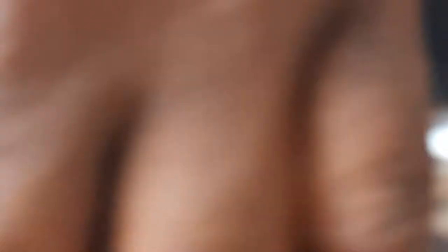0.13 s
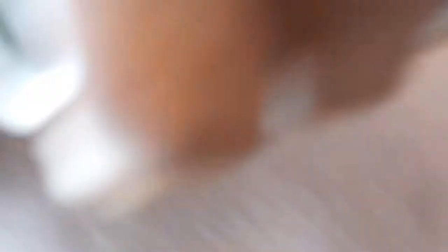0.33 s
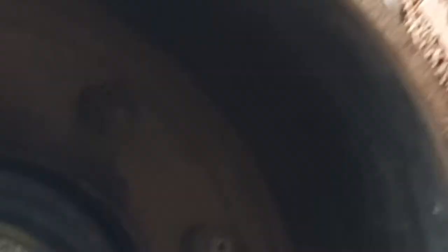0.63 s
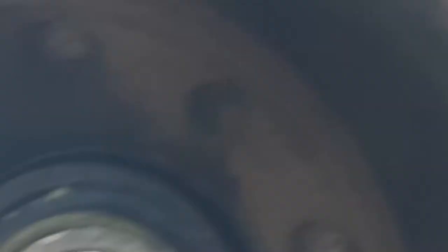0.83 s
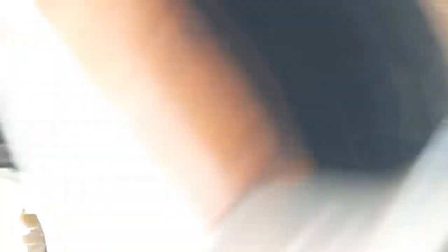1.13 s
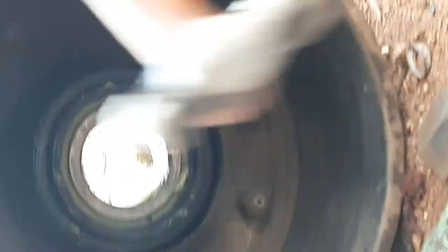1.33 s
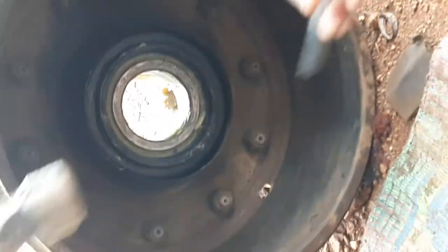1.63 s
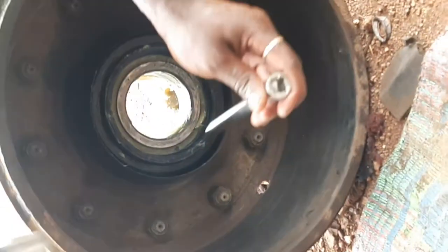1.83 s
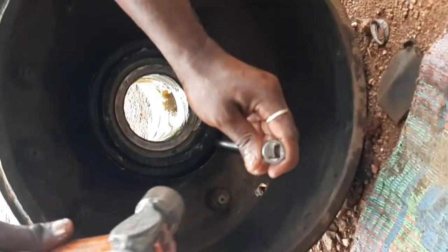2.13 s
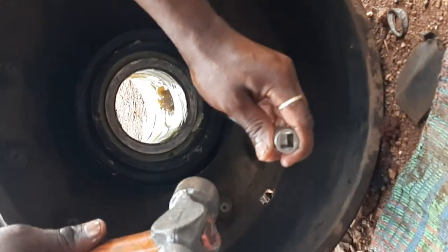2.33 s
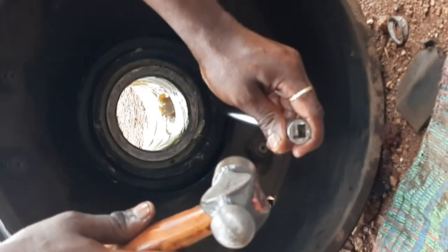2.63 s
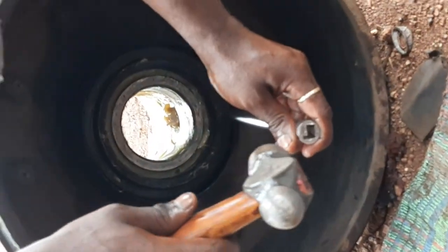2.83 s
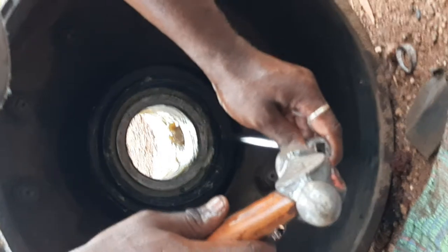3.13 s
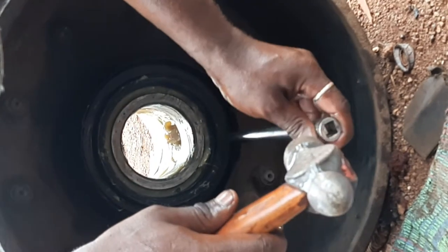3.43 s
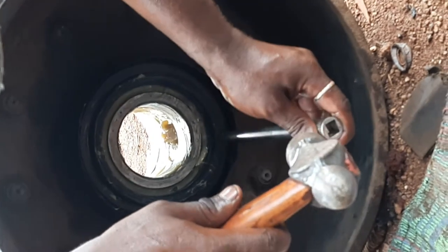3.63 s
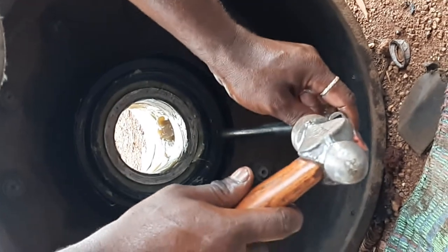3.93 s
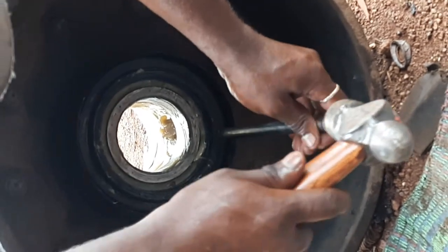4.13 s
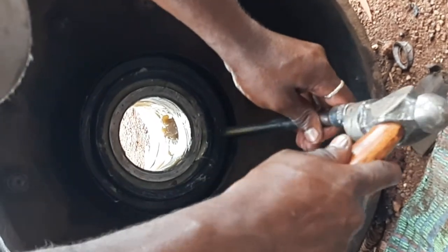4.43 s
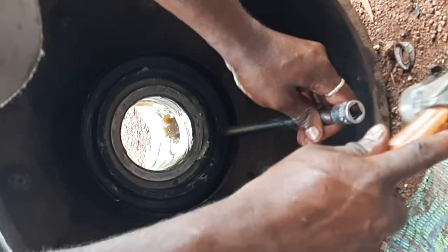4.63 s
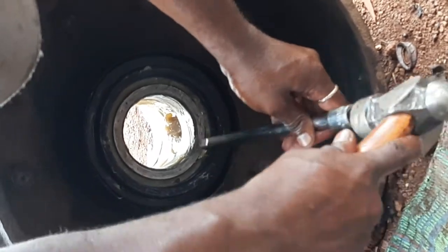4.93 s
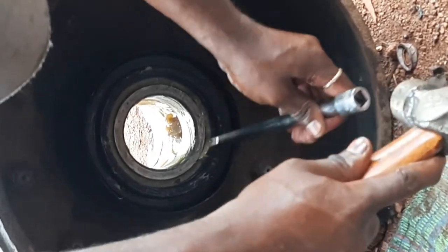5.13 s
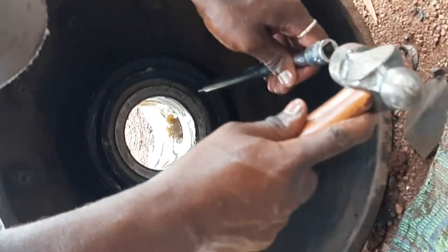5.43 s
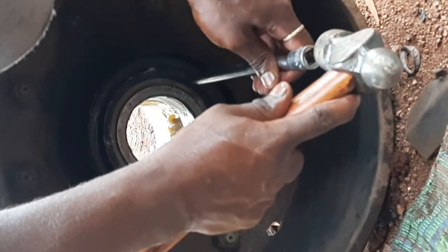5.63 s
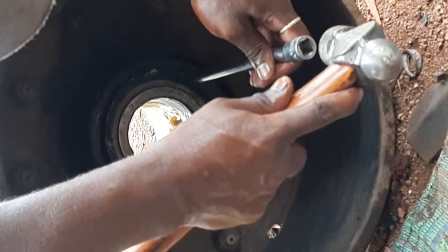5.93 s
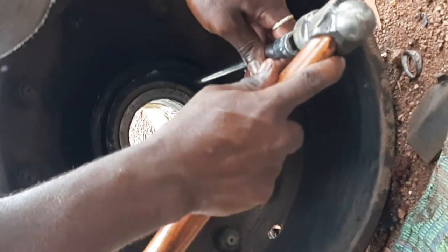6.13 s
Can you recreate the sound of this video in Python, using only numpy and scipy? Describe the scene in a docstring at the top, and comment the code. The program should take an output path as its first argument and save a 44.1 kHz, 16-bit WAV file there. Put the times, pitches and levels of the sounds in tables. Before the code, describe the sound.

A hammer knocks a hand-held steel drift in a hollow drum outdoors: one bright clink, a quiet pause, a hard crack, quick rebounds, a last tap.

```python
"""A ball-peen hammer and a hand-held steel drift work on a bearing seat in a heavy wheel drum, outdoors.
First a palm slides and fingers brush close by, over a low rumble and hiss, all of shaped noise that swells.
The hands bump and the drift touches its seat; then a blow: noise crack, ringing drift, clattering drum.
A faint bird sings in rising sine sweeps, and the drift touches the seat again.
From 4.4 s more blows and rebounds follow, the last at 6.1 s; the hand soon damps each ring."""
import sys
import numpy as np
from scipy import signal
from scipy.fft import rfft, irfft
from scipy.io import wavfile
from scipy.ndimage import uniform_filter1d

SR = 44100
rng = np.random.default_rng(int(sys.argv[2]) if len(sys.argv) > 2 else 0)


def wrap_up_sound(samples):
    """Save the sound to the file named by the first command line argument, as 16-bit audio."""
    columns = np.atleast_2d(samples).T
    # keep every value between -1 and 1, then stretch to whole-number steps
    tamed = np.clip(columns, -1, 1)
    steps = np.round(tamed * 32767).astype(np.int16)
    wavfile.write(sys.argv[1], SR, steps)


N = 277389

# All levels are those of the mix ahead of record(); spectra give only the colour of a noise.
# background swells: (start [s], end [s], rumble level at start [dB], hiss level at start [dB], growth [dB/s])
SWELLS = [(-.18, 1.17, -57.5, -61, 5.5), (2.286, 4.4, -52.5, -58.5, .4), (4.397, 4.87, -51.5, -63, -1),
          (5.991, 6.3, -52.5, -60, 1)]
QUIET_RUMBLE_DB, QUIET_HISS_DB = -63.5, -71  # the bed that the swells are added to
RISE_S, SINK_S = 0.35, 0.18  # fade-in; time for a swell to sink to 1/e
# spectra of the low rumble, the swelling hiss and the steady far hiss: (frequency [Hz], density [dB per Hz])
RUMBLE = [(20, -20.5), (40, -12.5), (70, -4.5), (125, 1), (220, -2.5), (350, -6), (550, -12.5),
          (900, -25.5), (1600, -46)]
HISS = [(500, 2.5), (900, 3.5), (1300, 3), (2000, -1), (3000, -4), (3700, -1), (4400, -3.5), (5000, -3),
        (6000, -8), (7700, -6), (8900, -17), (11500, -18.5), (13000, -25), (15700, -28.5)]
FAR_HISS = [(800, -3), (1300, 1.5), (2500, -3), (4800, 0), (6200, -5), (7600, -3), (9000, -15.5),
            (12000, -24), (15700, -32)]
# left-right likeness of most noises: (frequency [Hz], correlation [-1 to 1])
LIKENESS = [(60, .45), (130, 0.75), (300, 0.86), (640, 0.71), (1400, -0.039), (3000, -0.067), (6000, .05),
            (15000, -0.1)]

# a palm sliding past: start [s], end [s], db = level at start [dB], growth_db [dB/s], sink to 1/e [s]
PALM = dict(start=-0.17, end=1.15, db=-60.5, growth_db=1.5, sink=0.089)
# spectrum of the sliding palm: (frequency [Hz], density [dB per Hz])
PALM_COLOUR = [(1000, -12), (2500, -3), (4000, 3), (5200, 1), (6500, -7), (9000, -11), (12000, -10),
               (15700, -14)]
# skin and tools brushing: (middle [s], nominal length [s], level before fades [dB], centre [Hz],
#   distance from the centre to 6 dB down [octaves])
BRUSHES = [(.108, 0.055, -61, 9000, 1.6), (0.354, .1, -63, 9000, 1.2), (0.406, 0.022, -48, 2200, 1.4),
           (0.63, 0.044, -59, 4040, 1.4), (0.745, 0.081, -51.5, 1150, 1.1), (0.806, 0.056, -49, 4350, .88),
           (.818, 0.057, -52.5, 13000, .3), (.988, .0054, -57, 12500, .35), (1.519, .1, -70.5, 12500, 0.48),
           (5.273, 0.037, -66, 2184, 0.46), (5.6, .2, -72, 2290, 0.31)]
# the hands bump the work: (time [s], approximate peak level [dB])
BUMPS = [(.725, -40.5), (2.539, -42.5), (2.904, -40), (3.104, -35.5), (4.473, -31.5), (4.525, -34),
         (4.647, -35), (6.079, -40.5), (6.209, -31.5)]

# the drift's tip touches the seat: (time [s], strength [dB], knock pitch [Hz], drift ring re strength [dB])
TOUCHES = [(0.725, -64.5, 1030, 13), (2.6931, -43.5, 5050, -1.5), (3.4247, -45.5, 4370, -3),
           (3.52, -57, 7300, -18)]
# what all touches share, named as the arguments of blow()
TOUCH = dict(hard_db=-5.5, thud_hz=200, thud_db=-19, clatter_db=-5.5, head_db=-30, bright_db=-8, place=.36, hold=0.0028, grip_db=1)
# hammer blows and rebounds: (time [s], strength [dB], hardness as treble [dB], knock pitch [Hz],
#   thud pitch [Hz], thud [dB], clatter [dB], hammer head [dB], drift ring [dB],
#   ring brightness [dB per octave], place of contact [share of the drift's length],
#   free ringing [s], grip [dB]); thud, clatter, head and ring are relative to the strength
BLOWS = [ (1.1695, -18, 6, 5016, 380.5, -5, -11, -35, 5.5, 1.4, 0.26, 0.026, -1),
         (4.4011, -9, -6.5, 2530, 240, -15.5, -15, -27, -7.5, 1.5, 0.42, 0.0059, 1.5),
         (4.8602, -13, 3.5, 6180, 105, 1, -.5, -17.5, -4.5, 3, 0.051, 0.018, 4),
         (4.879, -25.5, 0, 2310, 400, -12, 2.5, 2, 4, -.3, .456, 0.006, 0.5),
         (4.9906, -32, -3, 2030, 200, -6.5, -17, -14, 3.5, -5.5, 0.23, 0.013, 6),
         (6.1224, -21, -1, 4410, 220, -30, -17.5, -36, -6, -3.5, 0.33, 0.02, 12), ]
# spectra of the crack of contact and of the clatter in the drum: (frequency [Hz], density [dB per Hz])
CRACK = [(100, -24), (400, -17), (750, -5), (1100, -3.5), (1750, -2), (2400, 0), (4500, -3), (6300, -3.5),
         (8200, -13.5), (10500, -14), (14000, -15), (15500, -32.5)]
CLATTER = [(60, -24.5), (200, -9.5), (400, -7), (800, -16.5), (1200, -6.5), (1750, -6.5), (2500, -2),
           (4200, 0.5), (6200, -2), (7400, -4.5), (8300, -19), (10200, -14.5), (12600, -19.5), (13700, -12),
           (15000, -38.5)]
# decay of the drum's hollow and of the yard's echo: (frequency [Hz], t60 [s])
CLATTER_T60 = [(200, .16), (1000, 0.096), (3500, 0.14), (7000, .11), (14000, 0.14)]
YARD_T60 = [(200, .3), (1500, .32), (6000, 0.34), (14000, .22)]
# left-right likeness of the boom of air from a blow: (frequency [Hz], correlation [-1 to 1])
THUD_LIKENESS = [(30, .1), (60, -.3), (130, -.88), (350, 0.94), (700, 0.97), (1400, .29)]
# notes of the drift, some split in pairs: (bending order [0 = lengthwise], frequency [Hz],
#   relative level [dB], t60 [s])
DRIFT = [(1, 1138, -4.4, 0.053), (2, 3063, -0.5, .092), (2, 3225, -15.5, 0.081), (3, 5885, 5, .06),
         (3, 6025, -9, .085), (4, 9410, -4.5, 0.086), (0, 10150, -15.5, 0.063), (5, 13535, -4.5, .065),
         (4, 10000, -20, .046)]
# notes of the hammer head and the drum's wall, and brief clanging modes of the drum:
#   (frequency [Hz], relative level [dB], t60 [s])
HEAD = [(3584, 0, .18), (3655, -6, .25), (3689, -4, .18)]
WALL = [(1497, -1, .13)]
DRUM = [(240, -11.5, .14), (463, -19, 0.24), (580, -8, 0.021), (1010, -14, 0.054), (2170, -6.5, 0.091),
        (2374, -6, 0.11), (2840, -8, 0.11), (3190, -6.5, 0.085), (4018, -8, 0.075), (4130, -9.5, .11),
        (4350, -6.5, 0.16), (4550, -21, .08), (4850, -8.5, 0.1), (5540, -6.5, 0.055), (5440, -6.5, 0.081),
        (6270, -6, .08), (6930, -14.5, 0.075), (7500, -10, 0.1), (12400, -17, 0.053)]
# a softer contact puts more into the knock and the drum's wall: level [dB], loss [dB per dB of hardness]
KNOCK_DB, KNOCK_PER_HARD = 1.5, 0.46
WALL_DB, WALL_PER_HARD = -21.5, 0.98
NODE_LEAK = 0.023  # power that a note keeps when struck on a node
RING_PAN_DB = -2  # left minus right
SHUDDER = 0.33  # rms depth of the ring's wavering, as a share in level and in radians of phase

# bird chirps: (time [s], length [s], peak level [dB])
CHIRPS = [(1.247, 0.095, -64), (1.618, .067, -73), (1.705, .065, -73)]
CHIRP_FROM_HZ, CHIRP_TO_HZ = 3300, 5200

EDGE_HZ = 15850  # upper band limit


def amp(db):
    """Turns decibels into gain."""
    return 10 ** (np.asarray(db) / 20)


def evened(x):
    """Scales to rms 1."""
    return x / np.sqrt(np.mean(x ** 2) + 1e-20)


def read(points, hz):
    """Reads a table on a log-frequency axis."""
    f, value = np.transpose(points)
    return np.interp(np.log(hz + 1), np.log(f), value)


def add(mix, s, sound):
    """Mixes a sound in at time s, cut off at the end of the mix."""
    part = mix[:, max(round(s * SR), 0):][:, :sound.shape[-1]]
    part += sound[..., :part.shape[1]]


def drifting(length, size):
    """A slow random curve of rms 1, smoothed over size samples."""
    return evened(uniform_filter1d(rng.standard_normal(length), size=size))


def swell(start, end, db, growth_db, sink):
    """Gain that fades in, grows steadily in dB until the end, then dies away."""
    t = np.arange(N) / SR
    level = amp(db + growth_db * (np.minimum(t, end) - start))
    rise = np.clip((t - start) / RISE_S, 0, 1)
    return level * rise * np.exp(-np.maximum(t - end, 0) / sink)


def hump(centre_hz, octaves):
    """A spectrum with one rounded top, 6 dB down at the given distance either side."""
    hz = np.geomspace(20, SR / 2, num=60)
    return np.transpose([hz, -6 * (np.log2(hz / centre_hz) / octaves) ** 2])


def noise(colour, size, likeness=LIKENESS, ripple_db=0):
    """Stereo noise of rms 1 with a given spectrum and left-right likeness, and chance peaks and valleys."""
    hz = np.fft.rfftfreq(size, 1 / SR)
    left, other = rfft(rng.standard_normal((2, size)))
    same = np.clip(read(likeness, hz), -1, 1)
    right = same * left + np.sqrt(1 - same ** 2) * other
    ripple = np.interp(hz, np.linspace(0, SR / 2, num=150), rng.uniform(-1, 1, size=150))
    gain = amp(read(colour, hz) + ripple_db * ripple)
    return evened(irfft(np.array([left, right]) * gain, size))


def damped(t, hold):
    """Effective decay time: the damping sets in gradually as the hand closes."""
    hold = abs(hold) + 1 / SR
    return t - 0.78 * hold * np.tanh(t / hold)


def fade(x, t60, hold):
    """Lets every band die at its own speed, slowly at first for the time hold."""
    hz, t, bands = signal.stft(x, SR, nperseg=256)
    bands = bands * amp(-60 * damped(t, hold) / read(t60, hz)[:, None])
    return signal.istft(bands, SR, nperseg=256)[1][:, :x.shape[1]]


def mode(hz, t, spread, rattle=0):
    """One vibration, reaching the two ports with different phases; loose contact makes it shudder."""
    apart = spread * rng.uniform(0.74, 1) * rng.choice([-1, 1])  # radians between the ports
    phase = 2 * np.pi * rng.random() + apart * np.array([[-0.5], [0.5]])
    angle = 2 * np.pi * hz * t + phase
    waver, slip = drifting(len(t), size=260), drifting(len(t), size=260)
    return np.sin(angle + rattle * slip) * (1 + rattle * waver)


def surroundings():
    """A lumpy low rumble and a smooth hiss that swell and sink together, over a steady far hiss."""
    low, high = amp(QUIET_RUMBLE_DB), amp(QUIET_HISS_DB)
    for start, end, rumble_db, hiss_db, growth_db in SWELLS:
        low = low + swell(start, end, rumble_db, growth_db, SINK_S)
        high = high + swell(start, end, hiss_db, growth_db, SINK_S)
    lumps = amp(0.7 * drifting(N, size=1500))
    rumble = low * lumps * noise(RUMBLE, N) * amp([[-0.8], [0.8]])  # right a little louder
    return rumble + high * noise(HISS, N) + amp(-75.5) * noise(FAR_HISS, N)


def palm():
    """Skin sliding close by, louder until it lets go: noise that catches and slips, with tiny ticks."""
    grip = drifting(N, size=260)
    slide = swell(**PALM) * amp(1.9 * grip) * noise(PALM_COLOUR, N)
    # about 45 catches a second, each a 2 ms burst of gain
    catches = (rng.random(N) < 45 / SR) * np.minimum(rng.exponential(1, N), 3)
    ticks = signal.lfilter([1], [1, -np.exp(-1 / (0.002 * SR))], catches)
    return slide * (1 + 0.7 * ticks)


def brushes():
    """Short strokes of skin and tools: rounded puffs of noise around one centre."""
    out = np.zeros((2, N))
    for s, length, db, centre_hz, octaves in BRUSHES:
        size = max(round(1.6 * length * SR), 64)  # with room for the fades
        stroke = noise(hump(centre_hz, octaves), size) * np.hanning(size)
        add(out, s - size / SR / 2, amp(db) * stroke)
    return out


def bumps():
    """Soft knocks of the hands: a 132 Hz vibration that swells and dies within milliseconds."""
    out = np.zeros((2, N))
    t = np.arange(SR // 10) / SR
    pulse = t / 0.0034 * np.exp(1 - t / 0.0031)
    for s, db in BUMPS:
        add(out, s, amp(db) * pulse * mode(132, t, spread=1.0))
    return out


def drift_notes(bright_db, place, grip_db):
    """Notes of the drift for one contact: bending is weak near a node; the grip mutes the lowest order."""
    notes = []
    for order, hz, db, t60 in DRIFT:
        shape = np.cos((order + 0.5) * np.pi * place + np.pi / 4) if order else 1
        db = db + bright_db * np.log2(hz / 3063)
        db = db + 10 * np.log10(shape ** 2 + NODE_LEAK) - grip_db * (order == 1)
        notes.append((hz, db, t60))
    return notes


def ring(notes, t, hold):
    """Lasting notes, shuddering until the hands damp them; high notes differ more between the ports."""
    age = damped(t, hold)
    total = 0
    for hz, db, t60 in notes:
        spread = min(0.91 + hz / 8500, 2.1)
        total = total + amp(db - 60 * age / t60) * mode(hz, t, spread=spread, rattle=SHUDDER)
    return total


def contact(t, hard_db, knock_hz):
    """Steel faces chatter for a few milliseconds, brighter when harder, with a knock of one pitch."""
    colour = [(hz, db + hard_db * np.clip((hz - 5000) / 8000, -0.25, 1)) for hz, db in CRACK]
    crack = amp(-60 * damped(t, 0.0032) / 0.03) * noise(colour, len(t), ripple_db=5.5)
    knock_gain = amp(KNOCK_DB - KNOCK_PER_HARD * hard_db - 60 * t / 0.028)
    return crack + knock_gain * mode(knock_hz, t, spread=0.51, rattle=0.3)


def drum_clatter(t, hold):
    """The drum answers with a crowd of brief modes, and the sound bounces about its hollow."""
    clang = 0
    for hz, db, t60 in DRUM:
        clang = clang + amp(db - 60 * t / t60) * mode(hz, t, spread=1.5, rattle=0.059)
    hollow = fade(noise(CLATTER, len(t), ripple_db=3.5), CLATTER_T60, hold)
    return amp(-2) * clang + amp(-2.5) * hollow


def thud(t, thud_hz):
    """The whole drum is shoved against the ground: one push of air, and a short boom."""
    u = 2 * np.pi * thud_hz * t
    push = (1 - u) * np.exp(-u) * amp([[4], [-2]])  # louder on the left
    boom = noise(hump(thud_hz, 1.9), len(t), THUD_LIKENESS) * amp([[-1], [1]])
    return push, amp(-60 * damped(t, 0.0051) / 0.021) * boom


def blow(hard_db, knock_hz, thud_hz, thud_db, clatter_db, head_db, ring_db, bright_db, place, hold, grip_db):
    """One contact of steel on steel, at unit strength: a sudden crack, then ringing that builds up."""
    t = np.arange(SR // 3) / SR
    push, boom = thud(t, thud_hz)
    drift_gain = amp(ring_db + RING_PAN_DB * np.array([[0.5], [-0.5]]))
    rings = drift_gain * ring(drift_notes(bright_db, place, grip_db), t, hold)
    rings = rings + amp(head_db) * ring(HEAD, t, hold)
    rings = rings + amp(WALL_DB - WALL_PER_HARD * hard_db) * ring(WALL, t, hold)
    clatter = amp(clatter_db) * drum_clatter(t, hold)
    # the push starts at once, the crack and boom almost so, the ringing a little later
    sudden = (1 - np.exp(-t / 0.00035)) * (contact(t, hard_db, knock_hz) + amp(thud_db) * boom)
    lasting = (1 - np.exp(-t / 0.00097)) * (rings + clatter)
    return amp(thud_db) * push + sudden + lasting


def hammering():
    """All touches and blows, with a weak echo from the yard: a decaying noise tail with a soft start."""
    direct = np.zeros((2, N))
    for s, db, knock_hz, ring_db in TOUCHES:
        add(direct, s, amp(db) * blow(knock_hz=knock_hz, ring_db=ring_db, **TOUCH))
    for s, db, *strike in BLOWS:
        add(direct, s, amp(db) * blow(*strike))
    t = np.arange(SR // 2) / SR
    tail = fade(rng.standard_normal((2, len(t))), YARD_T60, 0) * (1 - np.exp(-t / 0.015))
    echo = signal.fftconvolve(direct, tail / np.linalg.norm(tail[0]), axes=1)[:, :N]
    return direct + amp(-29.5) * echo


def bird():
    """Faint whistles: sines that sweep upward with a slight random wobble in pitch."""
    out = np.zeros((2, N))
    for s, length, db in CHIRPS:
        size = round(length * SR)
        hz = np.linspace(CHIRP_FROM_HZ, CHIRP_TO_HZ, size) + 130 * drifting(size, size=60)
        whistle = np.sin(2 * np.pi * np.cumsum(hz) / SR)
        add(out, s, amp(db) * whistle * signal.windows.tukey(size, 0.5))
    return out


def scene():
    """Everything at the two microphone ports."""
    return surroundings() + palm() + brushes() + bumps() + hammering() + bird()


def record(dry):
    """A small microphone: lifts soft sound 0.8 dB, rounds peaks, drops the deepest bass and the top treble."""
    rounded = 1.172 * np.tanh(dry / 1.065)
    thinned = signal.sosfilt(signal.butter(2, 38, "highpass", fs=SR, output="sos"), rounded)
    low_pass = signal.firwin(511, EDGE_HZ, window=("kaiser", 9), fs=SR)
    return signal.oaconvolve(thinned, low_pass[None], "same", axes=1)


dry = scene()
out = record(dry)
wrap_up_sound(out)
```